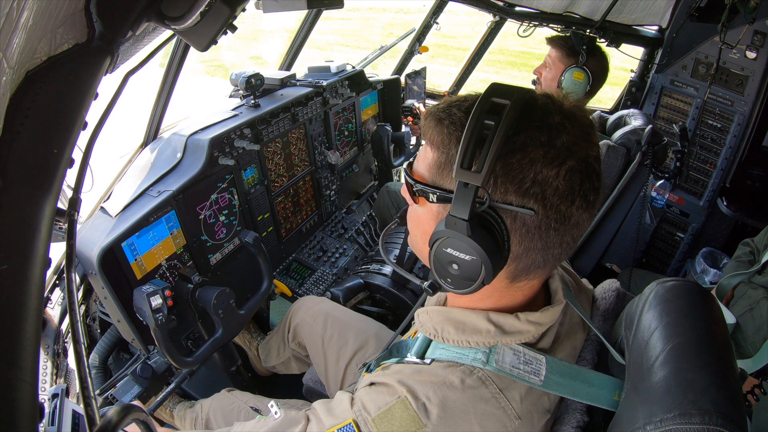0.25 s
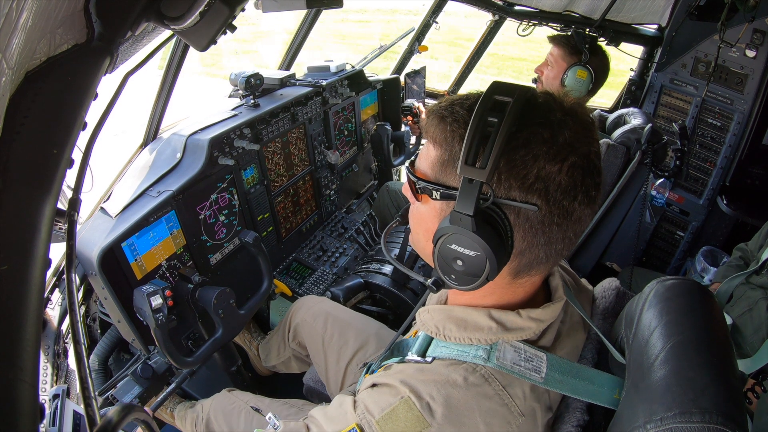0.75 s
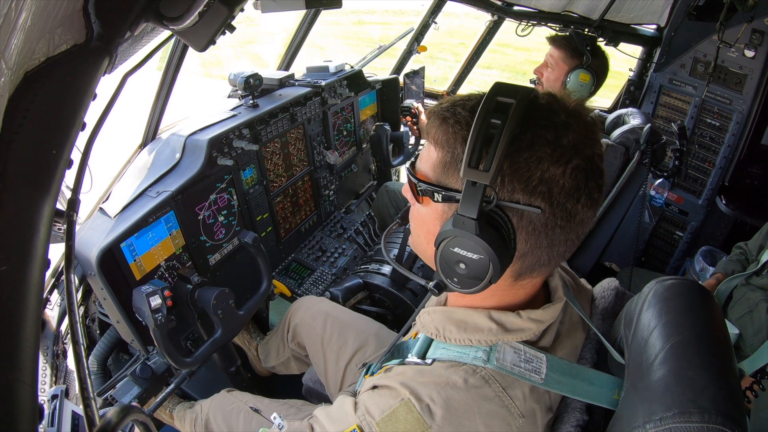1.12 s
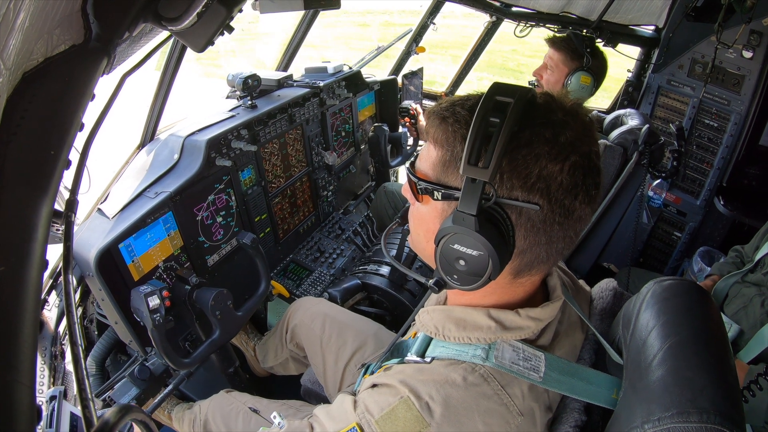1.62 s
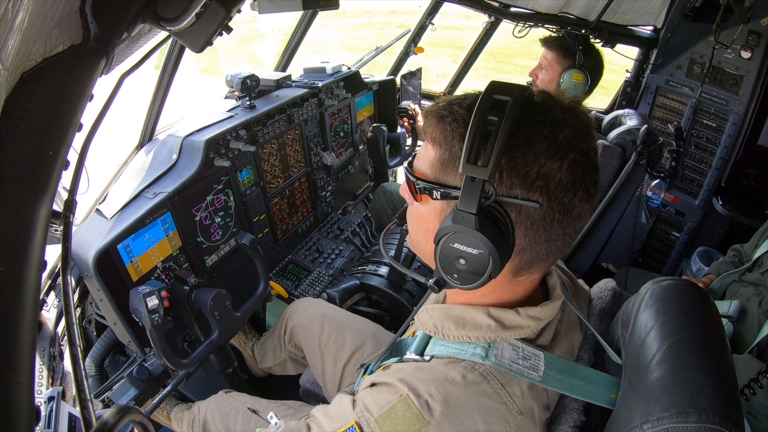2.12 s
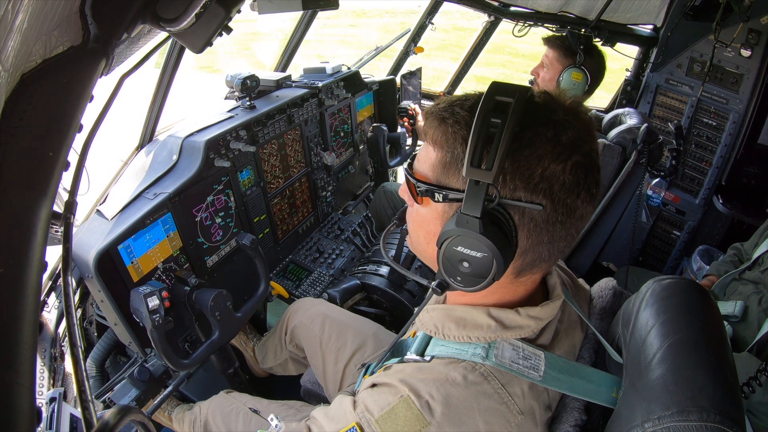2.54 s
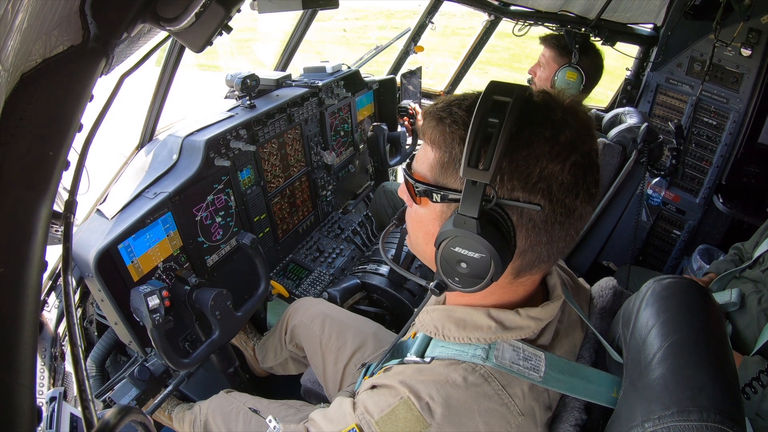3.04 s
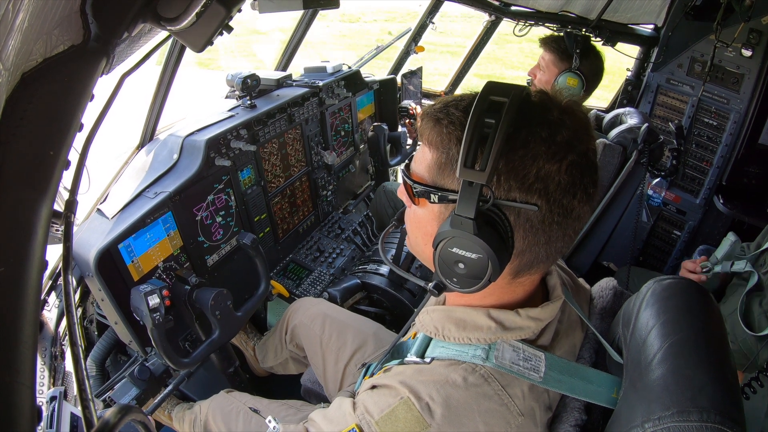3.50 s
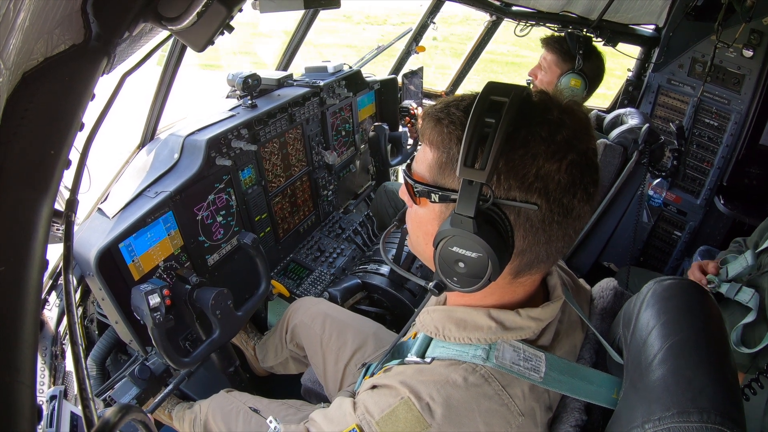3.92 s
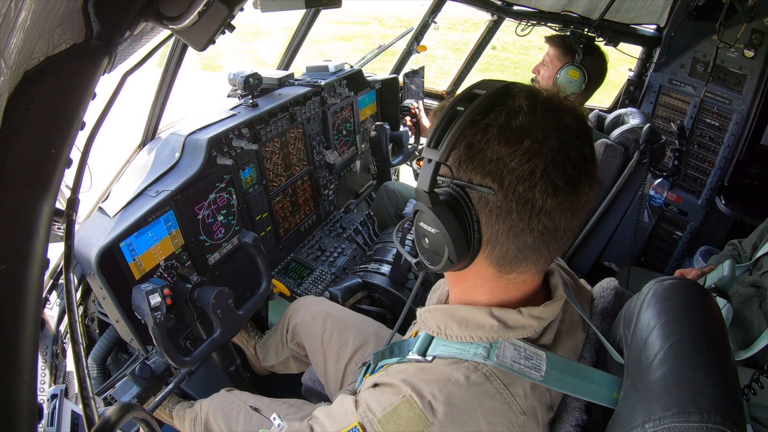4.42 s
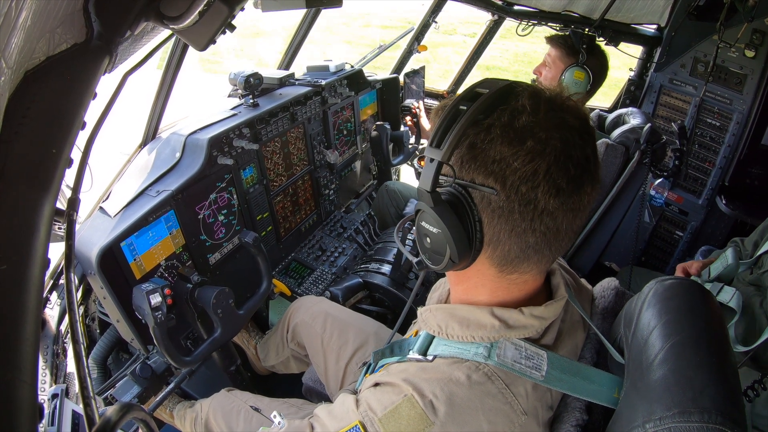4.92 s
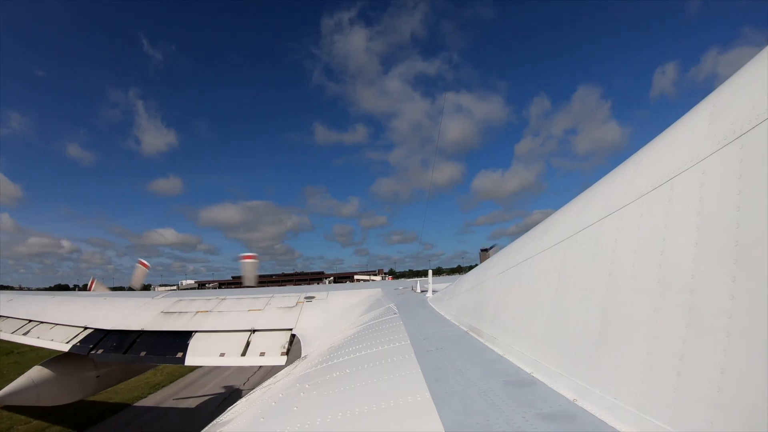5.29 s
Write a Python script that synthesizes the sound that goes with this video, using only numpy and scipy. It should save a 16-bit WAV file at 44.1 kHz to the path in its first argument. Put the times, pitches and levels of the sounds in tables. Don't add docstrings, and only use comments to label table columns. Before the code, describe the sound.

Loud low propeller throb and boomy cabin rumble under constant high gear whine, ending with a sudden switch to rough outdoor slipstream and jet hiss.

```python
import sys
import numpy as np
from scipy import signal
from scipy.fft import rfft, irfft, next_fast_len
from scipy.io import wavfile
from scipy.ndimage import uniform_filter1d

SR = 44100
rng = np.random.default_rng(int(sys.argv[2]) if len(sys.argv) > 2 else 0)


def volts(x):
    e = np.asarray(x, float) / 20
    return 10 ** e


def wav_record(signal):
    frames = np.transpose(np.atleast_2d(signal))
    bounded = np.clip(frames, -1, 1)
    quanta = np.round(bounded * 32767).astype(np.int16)
    wavfile.write(sys.argv[1], SR, quanta)


N = 244755
SIZE = next_fast_len(N)
HZ = np.maximum(np.arange(SIZE // 2 + 1) * SR / SIZE, 1)
T = np.arange(N) / SR
FADE_S, CUT_S = 5.236, 5.249


def in_time(rows):
    time_s, *columns = np.transpose(rows)
    return [np.interp(T, time_s, column) for column in columns]


def at_hz(points):
    hz, value = np.transpose(points)
    return np.interp(np.log(HZ), np.log(hz), value)


def drift(rate_hz):
    pole = np.exp(-80 * np.pi * rate_hz / SR)
    noise = rng.standard_normal(N // 40 + 2002)
    slow = signal.lfilter([1], [1, -2 * pole, pole * pole], noise)[2000:]
    slow = (slow - slow.mean()) / slow.std()
    return np.interp(np.arange(N) / 40, np.arange(len(slow)), slow)


def hump_power(humps):
    return sum(volts(level_db) ** 2 / (1 + (1.65 * (HZ - hz) / width_hz) ** 2) ** 2
               for hz, width_hz, level_db in humps)


def stereo_noise(left, right, alike, lead_rad):
    mid, side = rfft(rng.standard_normal((2, SIZE))) * np.sqrt(SR / 4)
    alike = np.clip(alike, 0, 1)
    mid = np.sqrt(1 + alike) * mid
    side = np.sqrt(1 - alike) * side
    left_bins = np.sqrt(left) * (mid + side) * np.exp(1j * lead_rad)
    right_bins = np.sqrt(right) * (mid - side)
    return irfft([left_bins, right_bins], SIZE)[:, :N]


def rough_order(humps, level_db):
    x = irfft(rfft(rng.standard_normal(SIZE)) * np.sqrt(hump_power(humps)), SIZE)
    even_s = 0.035
    power = uniform_filter1d(np.abs(signal.hilbert(x)) ** 2 / 2, int(even_s * SR))
    return volts(level_db) * (x / np.sqrt(power + 0.02 * power.mean()))[:N]


# peak_s, order, rise_db
SURGES = [(0.02, 4, 5.5), (0.34, 3, 2.5), (0.6, 2, 4.5), (0.6, 5, 4.5), (1.53, 3, 6), (1.11, 3, 2.5),
          (1.11, 5, 4.5), (1.43, 4, 8), (1.53, 5, 4), (1.61, 2, 7), (1.75, 4, 0.5), (1.88, 3, 5),
          (2.13, 2, 11), (2.17, 4, 5.5), (2.29, 1, 10), (2.44, 5, 5), (2.48, 3, 5), (2.63, 3, 10),
          (2.76, 1, 13.5), (2.89, 3, 9), (3.2, 5, 0), (3.25, 2, 6), (3.91, 3, 8.5), (3.92, 4, 3),
          (4.34, 2, 8), (4.42, 5, 4), (4.48, 3, 6.5), (4.99, 4, 2), (5.02, 2, 6), (5.07, 3, 6)]


def surges(order):
    half_length_s = 0.041
    return sum(rise_db * np.exp(-((T - peak_s) / half_length_s) ** 2 / 2)
               for peak_s, k, rise_db in SURGES if round(k) == order)


# pitch_hz, width_hz, level_db
FIRST = [(66, 4, 3), (70.3, 4, -9)]
SECOND = [(130.1, 7.7, 5), (138.6, 29, 1.5)]
THIRD = [(185.6, 8.4, 5), (198.3, 20, -7)]
FOURTH = [(251.8, 3.2, -0.5), (242.7, 18.5, -3)]
FIFTH = [(316.8, 12.5, 6.5), (312.4, 18, -0.5), (336.6, 6.6, 1)]
# humps, level_db, swell_db at each cancellation, lumps_db of random swing
ORDERS_ROUGH = [
    (FIRST, -31.0, 0.3, 2.3),
    (SECOND, -26, 1.5, 0.88),
    (THIRD, -25, 0.36, 1.3),
    (FOURTH, -24, 0.3, 2.6),
    (FIFTH, -23.5, 0.43, 3.1),
]
# time_s, level_db
TONE_LEVEL = [(0.0, -3), (0.5, 3.5), (0.78, 8.5), (0.9, 2.0), (1.02, -1), (1.1, 0.5), (1.4, 0.5), (1.85, -0.5),
              (2.15, -8), (2.75, -3), (2.92, -3), (3.05, 0), (3.7, -1.5), (4.15, 6), (4.6, -5), (5.2, -2)]


def propellers():
    blade_hz, beat_hz, first_null_s = 65.49, 0.55, 0.69
    since = T - first_null_s
    flutter_db = 0.8
    fast = volts(-20 + flutter_db * drift(0.5)) * np.sin(2 * np.pi * blade_hz * since)
    slow = volts(-22 + flutter_db * drift(0.95)) * np.sin(2 * np.pi * (blade_hz - beat_hz) * since)
    tones = np.sqrt(2) * volts(in_time(TONE_LEVEL)[0]) * (fast - slow)
    beat = np.cos(2 * np.pi * beat_hz * since)
    orders = 0
    for order, (humps, level_db, swell_db, lumps_db) in enumerate(ORDERS_ROUGH, 1):
        drive_db = level_db + swell_db * beat + surges(order) + lumps_db * drift(12)
        orders = orders + rough_order(humps, drive_db)
    return tones + orders * volts(np.array([[.25], [-.25]]))


def whine(hz, flutter_db, multiples):
    turn, out = 2 * np.pi * np.cumsum(hz) / SR, 0
    for multiple, left_db, right_db, lead_rad in multiples:
        phase = multiple * turn + rng.uniform(0, 2 * np.pi)
        left = volts(left_db) * np.sin(phase + lead_rad)
        right = volts(right_db) * np.sin(phase)
        out = out + np.sqrt(2) * volts(flutter_db * drift(1.7)) * np.array([left, right])
    return out


# multiple, left_db, right_db, lead_rad of the left port
FAN_A = [(1, -59, -53, -0.3), (2, -56, -57, 0.9), (3, -53, -54, 0.1), (4, -59, -46, 2.8),
         (5, -62, -55, 1.7), (6, -71, -61, -2.2), (7, -85, -76, 1.9)]
FAN_B = [(1, -55, -59, -0.8), (2, -58, -57, 0.3), (3, -58, -55, 0.5), (4, -53, -49, 1.7),
         (5, -65, -65, -3.0), (6, -78, -67, 0.1), (8, -79, -78, -0.1)]
FAN_C = [(2, -66, -64, 0.1), (3, -53, -54, -0.9), (4, -61, -41, 0.3), (5, -73, -74, 0.2),
         (6, -75, -68, 2.7), (7, -84, -75, 1.0)]
GEAR_A = [(1, -45, -48, -1.1), (2, -59, -64, -0.8), (4, -62, -56, 0.5)]
GEAR_B = [(1, -43, -42, -0.6), (2, -57, -56, -0.7)]
TURBINE = [(1, -86, -78, 2.4)]
PUMP_A = [(1, -63, -60, -0.4)]
PUMP_B = [(1, -63, -57, 0.3)]
SIDE_WHISTLE = [(1, -74, -53, -1.0)]
WHISTLE = [(1, -58, -46, -0.1)]
# pitch_hz, wander_hz, flutter_db, harmonics
ROTORS = [
    (1685.95, .25, 2.0, FAN_A),
    (1663.5, .2, 1.2, FAN_C),
    (1386.1, .4, 1.8, GEAR_A),
    (13884, 1.5, 2.5, TURBINE),
    (5394, 2.5, 3.0, PUMP_A),
    (5447, 3.5, 3.0, PUMP_B),
    (7267, 2.5, 3.0, SIDE_WHISTLE),
]
# time_s, pitch_hz
GEAR_B_SPEED = [(0.0, 1367), (0.7, 1371), (2.92, 1365), (3.2, 1368), (5.14, 1368), (5.24, 1371)]
# time_s, level_db
FAN_B_LEVEL = [(0.0, -52), (0.31, -41), (0.48, -51), (1.33, -45), (1.49, -42), (1.84, -46), (1.98, -47),
               (4.45, -51), (5.24, -51)]
# time_s, pitch_hz
WHISTLE_PITCH = [(0.0, 7546), (2.68, 7555), (5.24, 7545)]
# time_s, level_db
WHISTLE_LEVEL = [(0.0, -51), (0.6, -53), (1.22, -46), (1.9, -59), (2.1, -49), (2.9, -44.5), (4.1, -57),
                 (5.24, -58)]


def machinery():
    steady = sum(whine(hz + wander_hz * drift(1.66), flutter_db, multiples)
                 for hz, wander_hz, flutter_db, multiples in ROTORS)
    gear = whine(in_time(GEAR_B_SPEED)[0], 0.98, GEAR_B)
    fan = whine(1614.8 + 0.29 * drift(3.1), 0.65, FAN_B)
    fan = fan * volts(0.56 * (in_time(FAN_B_LEVEL)[0] + 48.5))
    whistle = whine(in_time(WHISTLE_PITCH)[0] + 1.56 * drift(7.5), 2.8, WHISTLE)
    whistle = whistle * volts(in_time(WHISTLE_LEVEL)[0] + 50.0)
    return steady + gear + fan + whistle


# pitch_hz, width_hz, level_db per Hz
HUMPS = [(17.5, 1.5, -39.5), (26.4, 3.4, -45), (48.4, 3.3, -38.5), (66.5, 20, -44), (77.6, 3.3, -51),
         (110, 19, -58.5), (276.5, 46, -45), (381.4, 5.2, -39), (427.5, 3, -40), (443.4, 21.5, -44),
         (511.3, 13.6, -47), (805, 120, -60), (1230, 24, -57.5), (1292, 126, -62.5), (1647, 35, -62.5),
         (2200, 57, -69.5), (2897, 91, -71.5), (3630, 160, -73.5), (4070, 92, -76), (5490, 310, -79),
         (467, 71, -51), (564, 52, -53.5), (1970, 70, -71.5), (3050, 85, -73.5), (10160, 300, -85)]
# pitch_hz, level_db per Hz
BOOM = [(12, -66), (20, -71), (45, -75), (85, -53.5), (110, -40.5), (165, -47), (212, -49), (300, -43.5),
        (360, -48.5), (410, -49), (520, -52.5), (640, -59.5), (900, -68), (2000, -130)]
# pitch_hz, level_db per Hz
HISS_LEFT = [(620, -60.5), (1050, -65.5), (1900, -73), (3300, -76.5), (4700, -77), (6100, -81.5),
             (6900, -85), (7500, -76), (8100, -81), (10900, -89.5), (11600, -93), (13700, -99.5),
             (14900, -109.2), (15500, -122.1)]
HISS_RIGHT = [(620, -56.5), (1050, -63.5), (1900, -72.5), (3300, -77), (4700, -75.5), (6100, -72.5),
              (6900, -66), (7500, -66.5), (8100, -78), (10900, -82), (11600, -87.5), (13700, -94.5),
              (14900, -108.1), (15500, -122.1)]
# pitch_hz, likeness 0-1
ALIKE = [(100, 0.99), (450, 1), (700, 0.59), (1300, 0.52), (2000, 1), (2450, 0.44), (2900, 0.72),
         (3700, 0.87), (4900, 0.7), (5500, 0.55), (7500, 0.23), (10000, 0), (14300, 0)]
# pitch_hz, lead_rad
LEAD = [(400, 0), (780, 0), (950, 0.2), (1200, 0.5), (2000, -1.2), (2900, 0), (5500, 0.43), (7400, 3.5)]


def cabin_noise():
    boom = volts(at_hz(BOOM)) ** 2 + hump_power(HUMPS)
    above = HZ ** 8 / (HZ ** 8 + 770.0 ** 8)
    lean = volts(0.74 / (1 + np.log2(HZ / 480) ** 4))
    left = boom * lean ** 2 + above * volts(at_hz(HISS_LEFT) - 0.72) ** 2
    right = boom / lean ** 2 + above * volts(at_hz(HISS_RIGHT) - 0.72) ** 2
    flicker_db = 0.33 * drift(13) + 0.36 * drift(6)
    return stereo_noise(left, right, at_hz(ALIKE), at_hz(LEAD)) * volts(flicker_db)


# pitch_hz, level_db per Hz
OUT_LEFT = [(40, -42.5), (120, -46.5), (250, -51), (700, -55.5), (1300, -66.5), (2700, -76), (4500, -81),
            (5900, -78), (7000, -86), (8800, -77), (11000, -91), (13500, -100.0), (15000, -107.0)]
OUT_RIGHT = [(40, -48), (120, -45), (250, -53), (700, -56.5), (1300, -60.5), (2700, -72), (4500, -76.5),
             (5900, -69.5), (7000, -67), (8800, -79.5), (11000, -84), (13500, -93.5), (15000, -106.9)]
# pitch_hz, width_hz, level_db per Hz
JET = [(6140, 410, -65.5)]
# pitch_hz, likeness 0-1
OUT_ALIKE = [(60, 0), (150, 0.7), (600, 0.3), (1400, 0), (3100, 0.7), (7000, 0)]


def slipstream():
    left = volts(at_hz(OUT_LEFT)) ** 2
    right = volts(at_hz(OUT_RIGHT)) ** 2 + hump_power(JET)
    x = stereo_noise(left, right, at_hz(OUT_ALIKE), 0)
    x = signal.sosfilt(signal.butter(6, 15000, fs=SR, output="sos"), x)
    ease_db = 2.5 * np.maximum(T - CUT_S, 0)
    buffet_db = 0.6 * np.array([drift(12), drift(21)])
    return x * volts(1.0 - ease_db + buffet_db)


def ducking(cockpit):
    memory_s, share = 0.07, 0.11
    power = uniform_filter1d(cockpit.mean(axis=0) ** 2, int(memory_s * SR))
    level_db = 10 * np.log10(power + 1e-9)
    return volts(0.3 - share * (level_db - level_db.mean()))


def scene():
    cockpit = propellers() + machinery() + cabin_noise()
    fade = np.clip((CUT_S - T) / (CUT_S - FADE_S), 0, 1)
    return cockpit * ducking(cockpit) * fade + slipstream() * (1 - fade) ** 2


def roll_off(x):
    return signal.sosfilt(signal.butter(12, 15600, fs=SR, output="sos"), x)


def record(dry):
    level_db = 20 * np.log10(np.abs(dry).max(axis=0) + 1e-6)
    fall_db = 90. * T
    held_db = np.maximum.accumulate(level_db + fall_db) - fall_db
    cut_db = .55 * np.maximum(held_db + 5.5, 0)
    attack_s = 0.0003
    smooth = np.exp(-1 / (attack_s * SR))
    limited = dry * volts(-signal.lfilter([1 - smooth], [1, -smooth], cut_db))
    mix = 1.12 * np.tanh(limited / 1.05)
    return roll_off(mix)


dry = scene()
out = record(dry)
wav_record(out)
```